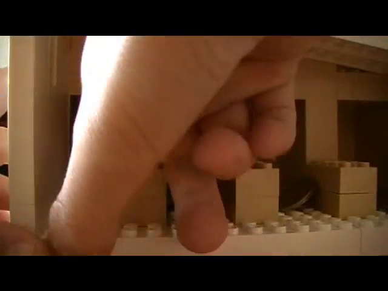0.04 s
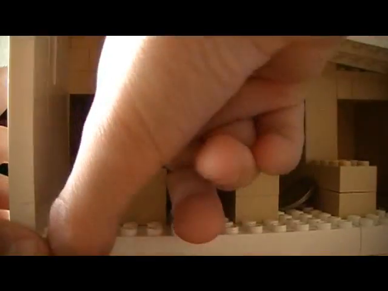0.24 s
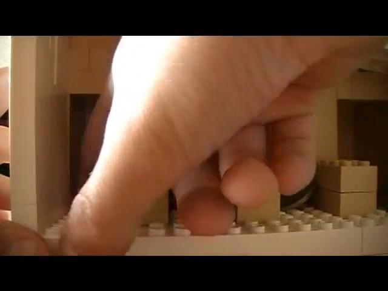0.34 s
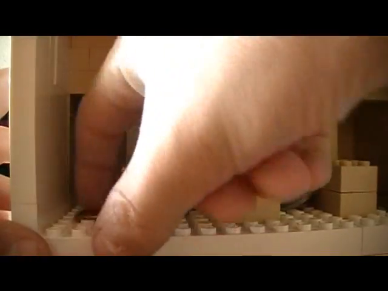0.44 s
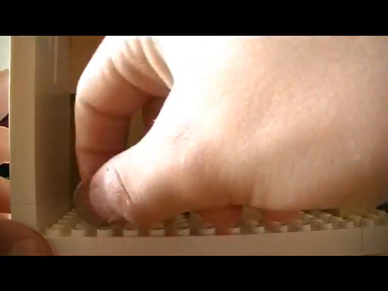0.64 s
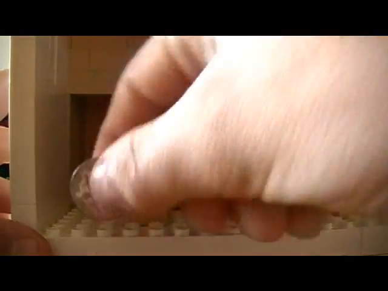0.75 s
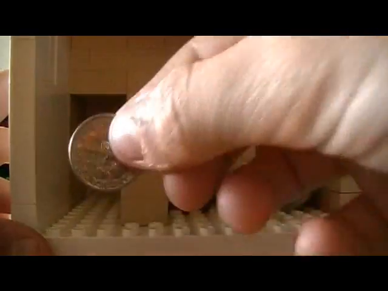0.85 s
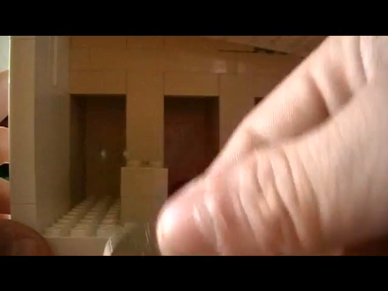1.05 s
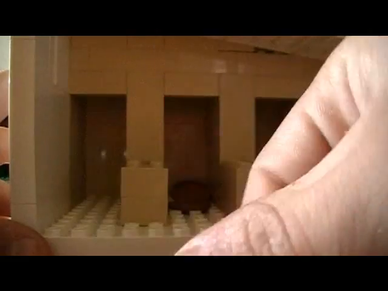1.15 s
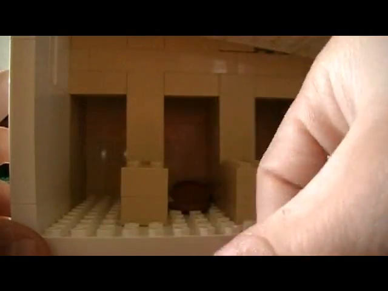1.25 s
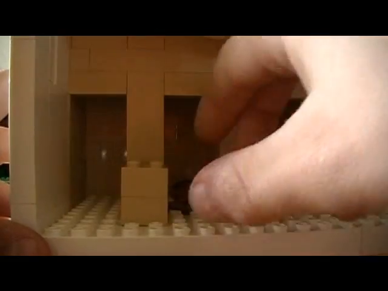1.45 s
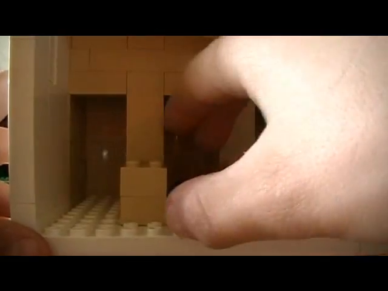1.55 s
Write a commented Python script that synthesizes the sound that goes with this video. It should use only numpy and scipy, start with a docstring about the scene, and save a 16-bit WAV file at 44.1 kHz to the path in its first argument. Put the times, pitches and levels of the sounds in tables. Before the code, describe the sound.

Coin clicking and scraping over plastic brick studs in a quick clatter, followed by a light snap

```python
"""Coin in a box of toy bricks

A coin is tapped, dragged over the studs and dropped in a small plastic box of bricks, heard close by.
Blows are snaps, noise cracks and short decaying brick modes; the drag is clumped tiny slips.
The drop adds dry ticks and very high coin modes; knocks ring the wall, low swings push the base plate.
Shaped noise makes scuffs, rustling fingers, hand rumble and the hush of a quiet room.
"""
import sys
import numpy as np
from scipy import signal
from scipy.fft import rfft, irfft
from scipy.io import wavfile
from scipy.ndimage import uniform_filter1d

SR = 44100
rng = np.random.default_rng(int(sys.argv[2]) if len(sys.argv) > 2 else 0)


def waveform_to_disk(signal):
    """Save audio, clipped to [-1, 1], as 16-bit WAV at the path in sys.argv[1]."""
    frames = np.transpose(np.atleast_2d(signal))
    scaled = np.clip(frames, -1, 1) * 32767
    samples = np.round(scaled).astype(np.int16)
    wavfile.write(sys.argv[1], SR, samples)


N = 70560

# Blows of the coin. Each row: start in seconds, level in dB, bass share in dB, treble share in dB,
# ring length factor, snap in dB.
BLOWS = [(0.2294, -5, -25.5, -11, 0.68, -1.5), (0.2317, -4.5, -23, -17.5, 0.66, -29),
         (0.2335, -15.5, -9.5, -31, 1, 2), (0.2775, -14, -13, -12, 0.69, -1),
         (0.2797, -8.5, -14.5, -10, 1, 3), (0.2815, -12, -36, -17.5, 0.57, 3.5),
         (0.2836, -13.5, -9.5, -28, 1, -29.5), (0.3211, -13.5, -7.5, -6, 1, 8),
         (0.3403, -20, 2, -21, 0.96, -3.5), (0.354, -17, -5, -7.5, 1, 0), (0.3593, -18, -8.5, -13, 0.98, 1),
         (0.3699, -11.5, -28, -9, 0.6, 5), (0.372, -15, -4.5, -11.5, 0.55, -1.5),
         (0.3809, -11.5, -11.5, -6.5, 0.77, 6.5), (0.3832, -6.5, -12, -18, 0.48, 2.5),
         (0.3893, -5.5, -17, -6.5, 0.75, -13.5), (0.3926, -12, -11.5, -5, 0.69, 1),
         (0.3984, -16.5, -3, -3, 0.98, 0), (0.4044, -13.5, -6, -1.5, 0.47, -6),
         (0.4122, -7.5, -15, -8.5, 0.52, -4), (0.4165, -8, -17, -11, 0.7, 0.5),
         (0.421, -14.5, -4, -12, 1, 6), (0.4327, -7, -18.5, -11, 1, -13),
         (0.4371, -11.5, -8, -6, 0.93, -7.5), (0.4511, -15.5, -10.5, -2, 0.82, -5.5),
         (0.463, -17.5, -15, -10, 1, 8), (0.4861, -15, -13.5, -27, 1, 3.5),
         (0.4975, -8, -20, -16.5, 0.68, 1.5), (0.4996, -11, -18, -7, 1, -8),
         (0.5032, -20, -1.5, -6, 1, 0.5), (0.5127, -9, -10, -13.5, 0.38, -14),
         (0.5163, -10, -8.5, -2, 0.56, 4.5), (0.5248, -12, -14, 3.5, 0.42, -11.5),
         (0.6335, -31.5, -3, -19, 0.9, -5), (0.658, -10, -10.5, -2, 0.69, 5)]
# Knocks on the box wall. Each row: start in seconds, level in dB, bass share in dB, treble share in dB,
# ring length factor, snap in dB.
WALL_KNOCKS = [(1.1424, -14.5, -22, -20, 0.69, 3), (1.1455, -28.5, -11.5, -21, 0.67, 11)]
# Shares of a plain blow. Each row: frequency in Hz, share in dB.
PLAIN_SHARES = [(900, -8), (3000, 2.5), (8000, -2)]
# Spectrum of snap and crack. Each row: frequency in Hz, density in dB per Hz.
CRACK_SPECTRUM = [(150, -48), (450, -12), (700, -1), (2600, -1.5), (3900, -1), (5900, 4), (8500, -7.5),
                  (11000, -23), (13000, -40)]
CRACK_DB, CRACK_T60_S, TREBLE_SPEED = -12, 0.053, 2.15  # speed: treble decay rate over dull decay rate
# Modes of the hollow bricks. Each row: frequency in Hz, level in dB.
BRICK_MODES = [(700, -8.5), (985, -16), (1340, 4), (2010, -4.5), (2510, -0.5), (2790, -5.5), (3040, -7),
               (3350, 6), (4180, 6), (4700, -2), (5170, -13), (5800, -8), (7300, -2.5)]
# Each row: frequency in Hz, level in dB, t60 in seconds, shorter with pitch.
BRICK_RINGS = [(hz, db, 0.045 * (hz / 1000) ** -0.4) for hz, db in BRICK_MODES]
BRICK_DB, BRICK_DETUNE = -8, 0.02
BRICK_LOW_CUT_HZ = 570  # blows and drag carry little below this
# Modes of the box wall. Each row: frequency in Hz, level in dB, t60 in seconds.
WALL_MODES = [(605, -4, 0.054), (1108, -23.5, 0.11), (1568, -6.5, 0.038), (3290, -8.5, 0.035),
              (4300, 2.5, 0.026), (9200, 4, 0.018)]
WALL_DB = 3.5

# Drag over the studs. Each row: time in seconds, level in dB.
DRAG_LEVEL = [(.285, -49), (.3, -36), (.315, -35), (.334, -42.5), (.35, -35), (.375, -23), (.4, -28),
              (.43, -25), (.445, -29.5), (.46, -31), (.475, -28.5), (.492, -35.5), (.51, -23.5),
              (.53, -28.5), (.548, -30), (.56, -37), (.572, -45)]
# Slips are duller than blows. Each row: frequency in Hz, change in dB.
DRAG_DULLING = [(3000, -1), (7000, -9.5), (12000, -7.5)]
SLIPS_PER_S, SLIP_SPREAD_DB, CLUMP_DB = 3000, 2.5, 2.5
DRAG_RING_DB, STUD_DETUNE = 3.5, 0.05

# Contacts as the dropped coin lands flat and rebounds. Each row: start in seconds, peak in dB.
TICKS = [(1.26522, -7.5), (1.26575, -6.5), (1.2702, -32), (1.2721, -27), (1.2745, -29), (1.2771, -29),
         (1.2788, -22), (1.2801, -27), (1.2869, -27), (1.2912, -34), (1.2936, -33), (1.2996, -38),
         (1.304, -39)]
# Spectrum of a contact. Each row: frequency in Hz, density in dB per Hz.
TICK_SPECTRUM = [(400, -19), (1500, -8), (4000, -2), (11000, -8.5)]
TICK_S = 0.0001  # decay time constant
# Modes of the coin. Each row: frequency in Hz, level in dB, t60 in seconds.
COIN_MODES = [(11500, -7, .05), (12130, -2, .04), (12240, -5, 0.069), (12410, -1.5, 0.044),
              (12480, -9, .06), (12615, -9.5, .085), (12800, -5, 0.049)]
# Blows that leave the coin free to ring. Each row: start in seconds, peak in dB, ring length factor.
PINGS = [(1.2668, -19.5, 0.35), (1.2718, -16.5, 0.4), (1.279, -21.5, 1), (1.291, -28, 0.89),
         (1.297, -29, 0.8)]
CHATTER_S, TREMBLE_DB, TREMBLE_S = 0.0013, -48, 0.088  # a faint tremble as the coin settles

# Low pushes through the base plate. Each row: start in seconds, peak in dB, length in ms, swing back 0-1.
THUDS = [(0.37, -40.5, 1.2, 0.4), (0.658, -18.5, 0.71, .9), (1.12, -42, 1.9, .6), (1.139, -38, 0.88, 1),
         (1.1453, -29.5, 0.7, 0.9), (1.2657, -36, 1.2, 0.4)]
# Soft scuffs and slides on plastic. Each row: start in seconds, length in seconds, level in dB,
# centre in Hz, width in Hz.
SCUFFS = [(0.592, 0.036, -49.5, 1220, 929), (0.608, .02, -45, 1200, 596), (0.632, 0.06, -48.5, 1480, 2050),
          (1.125, 0.0073, -57.5, 487, 900), (1.163, 0.075, -52.5, 1290, 2510),
          (1.147, 0.019, -42, 1095, 1420), (.282, .016, -31.5, 790, 415), (1.447, 0.012, -50, 1590, 1530),
          (1.454, 0.026, -51.5, 754, 703), (1.489, 0.035, -53, 1590, 1260), (1.509, .016, -46.5, 1350, 620),
          (1.539, 0.014, -54, 965, 1512), (1.582, 0.02, -53, 664, 604)]
# Fingers on plastic. Each row: time in seconds, rustle level in dB.
RUSTLE_LEVEL = [(0, -67), (.03, -56), (.11, -62.5), (.19, -65), (.225, -55.5), (.57, -48.5), (.645, -54),
                (.69, -54), (.71, -52.5), (.8, -56.5), (.84, -61), (.9, -67), (1.1, -70.5), (1.14, -51.5),
                (1.2, -58.5), (1.25, -62), (1.275, -39), (1.305, -52.5), (1.36, -59.5), (1.44, -58.5),
                (1.6, -62)]
# Each row: frequency in Hz, density in dB per Hz.
RUSTLE_SPECTRUM = [(300, -23), (700, -8.5), (1450, 3), (2000, -4.5), (2650, -1), (3600, -8), (4400, -1),
                   (5100, -8.5), (5800, -6.5), (8000, -11), (11000, -21), (12200, -36), (13200, -56)]
# Low rumble of the hand. Each row: time in seconds, level in dB.
RUMBLE_LEVEL = [(0, -63.5), (.03, -59), (.19, -62.5), (.33, -49.5), (.43, -50.5), (.57, -59.5), (.69, -85),
                (.95, -72.5), (1.08, -67.5), (1.13, -60), (1.23, -59.5), (1.36, -70.5), (1.6, -58)]
# Each row: frequency in Hz, density in dB per Hz.
RUMBLE_SPECTRUM = [(20, -19.5), (60, -22.5), (200, 0.5), (400, -6), (650, -1), (1000, -24.5), (2000, -63)]
# Quiet room. Each row: frequency in Hz, density in dB per Hz.
HUSH_SPECTRUM = [(12, -64), (20, -29), (152, -6), (195, -0.5), (408, -10.5), (567, -13), (1560, -12.5),
                 (2170, -27.5), (11900, -27.5), (14000, -45.5)]
HUSH_RMS_DB = -72

# Stereo noise. Each row: frequency in Hz, left-right likeness.
LIKENESS = [(60, -2.3), (230, 0.48), (900, 0.48), (3510, 0.95), (13600, 0.53)]
# Side signal of the ports. Each row: frequency in Hz, level in dB.
SIDE_LEVEL = [(60, -5.5), (200, -4), (500, -18.5), (1200, -13.5), (2500, -15), (5000, -22), (8500, -5.5),
              (12500, -13.5)]
TILT_DB = 0.5  # left minus right
# Room decay. Each row: frequency in Hz, t60 in seconds.
ROOM_DECAY = [(300, 0.083), (2000, 0.079), (8000, 0.054)]
ROOM_DB = -22.5
# Microphone roll-off. Each row: frequency in Hz, gain in dB.
TREBLE_ROLL_OFF = [(12900, 0), (13500, -34.5), (14200, -31)]
BAND_EDGE_HZ = 14228


def struck(table, modes, modes_db, detune):
    """Each blow: a snap, a crack of noise and the modes of what is struck, coloured by where it lands."""
    out, t, hz = np.zeros(N), np.arange(4096) / SR, np.fft.rfftfreq(2048, 1 / SR)
    snap = peak(causal(read(CRACK_SPECTRUM, hz)))
    share_hz, plain_db = np.transpose(PLAIN_SHARES)
    for s, db, bass_db, treble_db, stretch, snap_db in table:
        raw, chance = np.split(rng.standard_normal(4200), [len(t)])
        dull = uniform_filter1d(raw, size=7)
        fade_db = -60 * t / max(CRACK_T60_S * stretch, 1e-3)
        crack = gain_of(fade_db) * dull + gain_of(TREBLE_SPEED * fade_db) * (raw - dull)
        kick = gain_of(CRACK_DB) * crack
        kick[0] = gain_of(snap_db)
        body = signal.oaconvolve(kick, snap)[:len(t)]
        body = body + gain_of(modes_db) * peak(ring(modes, t, 1 + detune * chance, stretch))
        shares_db = np.array([bass_db, 0, treble_db]) - plain_db
        colour = causal(read(list(zip(share_hz, shares_db)), hz))
        add(out, s, gain_of(db) * signal.oaconvolve(body, colour)[:len(t)])
    return out


def brick_blows():
    """The coin's blows excite the brick modes, slightly detuned each time."""
    return struck(BLOWS, BRICK_RINGS, BRICK_DB, BRICK_DETUNE)


def drag():
    """Clumped tiny slips of the coin edge, partly ringing the bricks, each stud a little differently."""
    heights = gain_of(SLIP_SPREAD_DB * np.minimum(rng.exponential(1, N), 5))
    happens = rng.random(N) < SLIPS_PER_S / SR
    clumps = gain_of(CLUMP_DB * evened(uniform_filter1d(rng.standard_normal(N), size=130)))
    slips = heights * happens * clumps * rng.choice([-1., 1.], N)
    hz = np.fft.rfftfreq(2048, 1 / SR)
    scrape = signal.oaconvolve(slips, causal(read(CRACK_SPECTRUM, hz) + read(DRAG_DULLING, hz)))[:N]
    stud, rung, ring_t = rng.integers(0, 8, N), np.zeros(N), np.arange(3000) / SR
    for k in range(8):
        factors = 1 + STUD_DETUNE * rng.standard_normal(len(BRICK_RINGS))
        rung += signal.oaconvolve(slips * (stud == k), ring(BRICK_RINGS, ring_t, factors, 1.0))[:N]
    t = np.arange(N) / SR
    edges = np.clip(np.minimum(t - DRAG_LEVEL[0][0], DRAG_LEVEL[-1][0] - t) / 0.022, 0, 1)  # 22 ms ramps
    blend = evened(evened(scrape) + gain_of(DRAG_RING_DB) * evened(rung))
    return edges * gain_of(curve(DRAG_LEVEL)) * blend


def wall_knocks():
    """Knocks excite the fixed modes of the box wall."""
    return struck(WALL_KNOCKS, WALL_MODES, WALL_DB, 0)


def ticks():
    """Each contact is a dry, very short scratch."""
    out, t = np.zeros(N), np.arange(256) / SR
    colour = causal(read(TICK_SPECTRUM, np.fft.rfftfreq(512, 1 / SR)))
    for s, db in TICKS:
        scratch = (1 + 0.1 * rng.standard_normal(len(t))) * np.exp(-t / TICK_S)
        add(out, s, gain_of(db) * peak(np.convolve(scratch, colour)))
    return out


def pings():
    """The coin's own high modes, set off by a brief chatter of contact."""
    out, t = np.zeros(N), np.arange(8192) / SR
    envelope = np.exp(-t / CHATTER_S) + gain_of(TREMBLE_DB) * np.exp(-t / TREMBLE_S)
    for s, db, stretch in PINGS:
        raw = rng.standard_normal(len(t))
        modes = ring(COIN_MODES, t, 1 + 0.002 * raw[::-1], stretch)  # detuned by the last few draws
        add(out, s, gain_of(db) * peak(signal.oaconvolve(modes, raw * envelope)))
    return out


def thuds():
    """Each push is one smooth low swing."""
    out = np.zeros(N)
    for s, db, ms, back in THUDS:
        u = np.arange(2000) / SR / (max(ms, 0.1) / 1000 / 3)  # time constant: a third of the length
        add(out, s, gain_of(db) * peak(u * (1 - back * u / 2) * np.exp(-u)))
    return out


def scuffs():
    """Grainy noise in one broad resonance, quick rise and slow fall."""
    out, hz = np.zeros(N), np.fft.rfftfreq(4096, 1 / SR)
    for s, length_s, db, centre_hz, width_hz in SCUFFS:
        raw = rng.standard_normal(4096)
        grain = raw * abs(raw)
        band = irfft(rfft(grain) / (1 + (2 * (hz - centre_hz) / width_hz) ** 2))
        u = np.arange(4096) / SR / length_s
        add(out, s, gain_of(db) * evened(band) * np.sin(np.pi * np.minimum(u, 1) ** 0.41))
    return out


def rustle():
    """Finger friction as mid-band noise with a moving level."""
    return noise(RUSTLE_SPECTRUM, curve(RUSTLE_LEVEL), patchy_db=0.0)


def rumble():
    """Hand movement as patchy low noise with a moving level."""
    return noise(RUMBLE_SPECTRUM, curve(RUMBLE_LEVEL), patchy_db=2.0)


def hush():
    """Quiet room as faint patchy noise."""
    return noise(HUSH_SPECTRUM, HUSH_RMS_DB, patchy_db=4.0)


def noise(spectrum, level_db, patchy_db):
    """Stereo noise from random short-time spectra with drifting patches."""
    frames, hz = N // 128 + 5, np.fft.rfftfreq(512, 1 / SR)
    a, b, c, d, patch = rng.standard_normal((frames, 257, 5)).T
    patch = uniform_filter1d(patch, size=6, axis=0)  # across frequency
    patch = evened(uniform_filter1d(patch, size=10, axis=1))  # across time
    same = np.clip(read(LIKENESS, hz), -1, 1)[:, None]
    left = a + 1j * b
    right = same * left + np.sqrt(1 - same ** 2) * (c + 1j * d)
    z = np.array([left, right]) * gain_of(read(spectrum, hz)[:, None] + patchy_db * patch)
    return gain_of(level_db) * evened(signal.istft(z, nperseg=512, noverlap=384)[1][:, :N])


def room(x):
    """Sparse random taps, each band dying at its own speed, other taps per channel."""
    taps = np.zeros((2, SR // 2))
    slots = np.arange(200, SR // 2 - 20, 20)
    at = slots + rng.integers(0, 20, (2, len(slots)))
    np.put_along_axis(taps, at, rng.choice([-1., 1.], at.shape), 1)
    hz, t, z = signal.stft(taps, SR, nperseg=256)
    fade_db = -60 * t / np.maximum(read(ROOM_DECAY, hz), 0.01)[:, None]
    tail = signal.istft(z * gain_of(fade_db), SR, nperseg=256)[1]
    return signal.fftconvolve(x[None], tail / np.linalg.norm(tail[0]), axes=1)[:, :N]


def ports(x):
    """Two close microphone ports: a quarter-turned side signal and a small balance."""
    z, tilt = rfft(x), gain_of(TILT_DB / 2)
    side = 1j * gain_of(read(SIDE_LEVEL, np.fft.rfftfreq(N, 1 / SR)))
    return irfft(np.array([z * (1 + side) * tilt, z * (1 - side) / tilt]), N)


def ring(modes, t, detune, stretch):
    """Sum of exponentially dying sine modes."""
    return sum(gain_of(db - 60 * t / max(t60 * stretch, 1e-3)) * np.sin(2 * np.pi * hz * d * t)
               for (hz, db, t60), d in zip(modes, detune))


def causal(db):
    """Minimum-phase response for a dB spectrum on rfft bins."""
    log = np.log(gain_of(np.maximum(db, -100)))
    log = np.concatenate([log, log[-2:0:-1]])
    return np.fft.ifft(np.exp(np.conj(signal.hilbert(log)))).real[:len(db)]


def read(points, hz):
    """Reads a spectrum table on a log frequency axis."""
    f, value = np.transpose(points)
    return np.interp(np.log(hz + 1), np.log(f + 1), value)


def curve(table):
    """Level of a time table, per sample."""
    s, level = np.transpose(table)
    return np.interp(np.arange(N) / SR, s, level)


def gain_of(db):
    """dB to amplitude gain."""
    return 10 ** (np.asarray(db) / 20)


def evened(x):
    """Scales to rms 1."""
    return x / np.sqrt(np.mean(x ** 2) + 1e-20)


def peak(x):
    """Scales to peak 1."""
    return x / abs(x).max()


def add(mix, s, sound):
    """Mixes a sound in at time s."""
    part = mix[round(s * SR):][:len(sound)]
    part += sound[:len(part)]


def scene():
    """Coin and bricks in the room, over hand rustle, rumble and hush."""
    low_cut = signal.butter(4, BRICK_LOW_CUT_HZ, "high", fs=SR, output="sos")
    bricks = signal.sosfilt(low_cut, brick_blows() + drag())
    near = bricks + wall_knocks() + ticks() + pings() + thuds() + scuffs()
    hand = rustle() + rumble()
    return ports(near) + gain_of(ROOM_DB) * room(near) + hand + hush()


def record(dry):
    """Treble roll-off, then the band limit."""
    dull = irfft(rfft(dry) * gain_of(read(TREBLE_ROLL_OFF, np.fft.rfftfreq(N, 1 / SR))), N)
    low_pass = signal.firwin(511, BAND_EDGE_HZ, window=("kaiser", 9), fs=SR)
    return signal.oaconvolve(dull, low_pass[None], "same")


dry = scene()
out = record(dry)
waveform_to_disk(out)
```